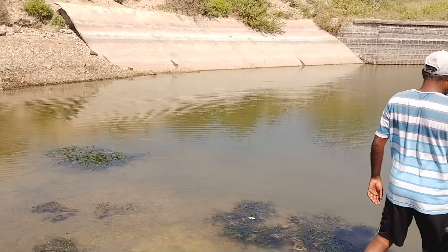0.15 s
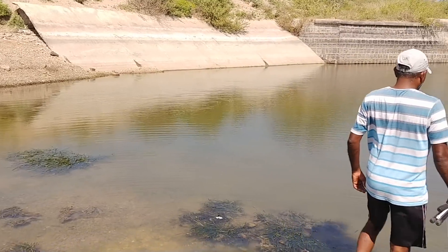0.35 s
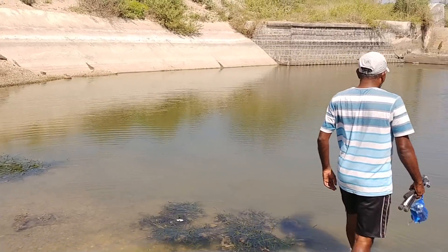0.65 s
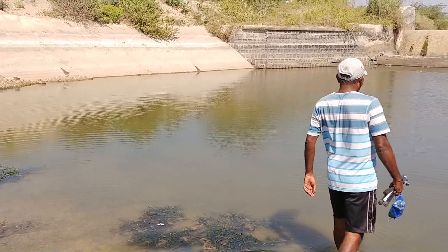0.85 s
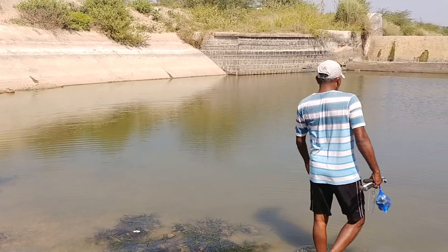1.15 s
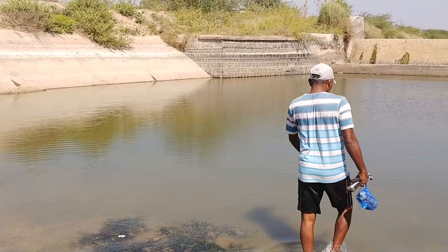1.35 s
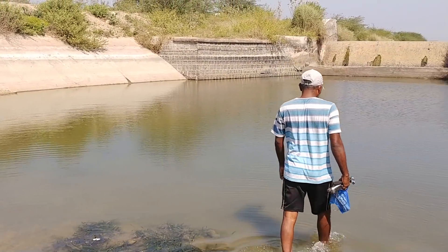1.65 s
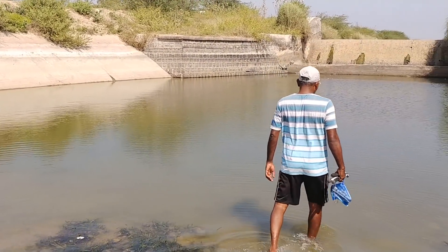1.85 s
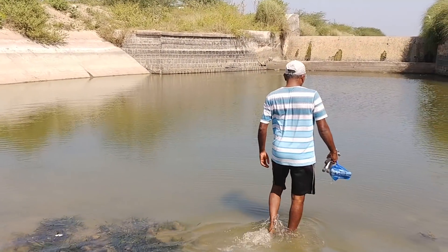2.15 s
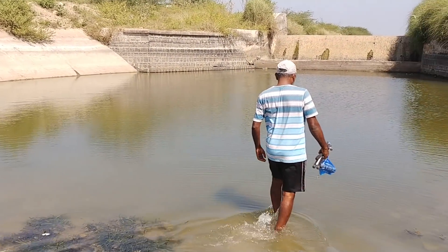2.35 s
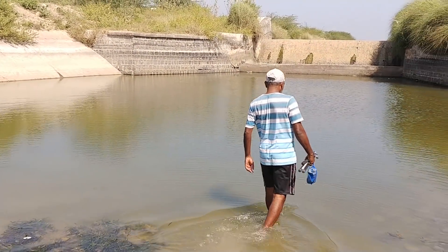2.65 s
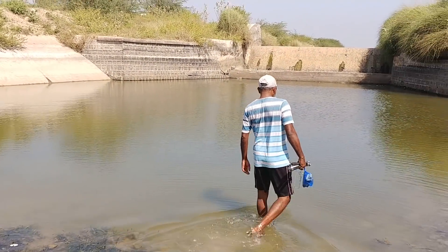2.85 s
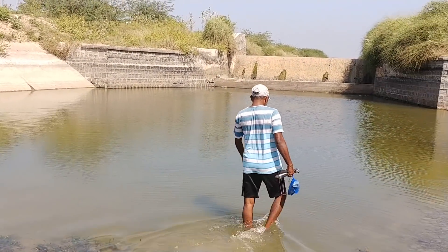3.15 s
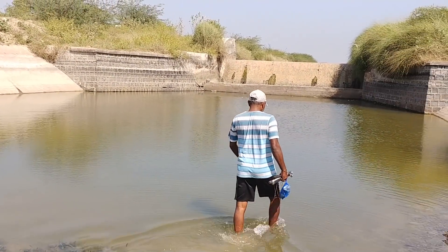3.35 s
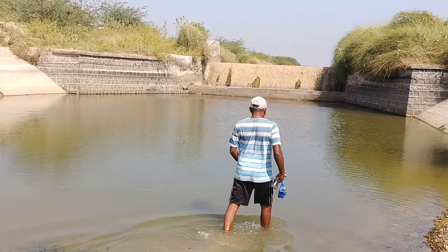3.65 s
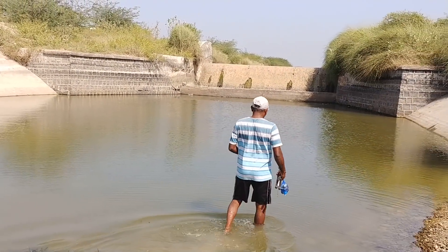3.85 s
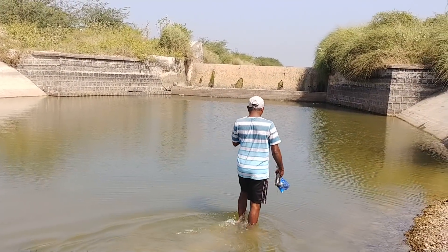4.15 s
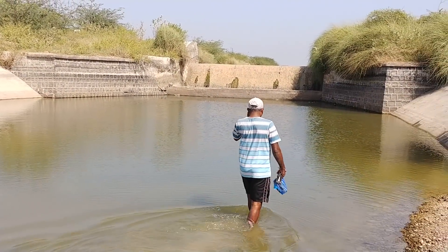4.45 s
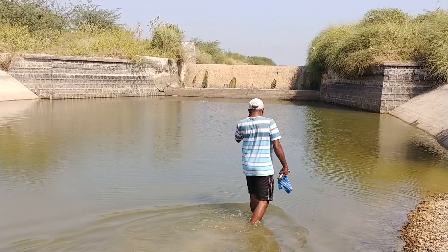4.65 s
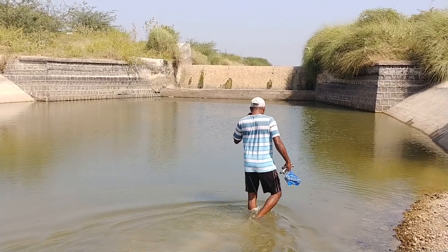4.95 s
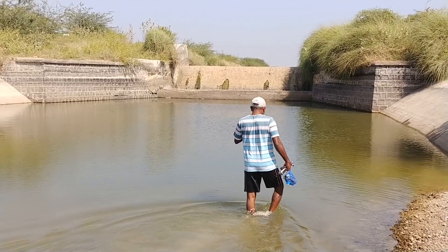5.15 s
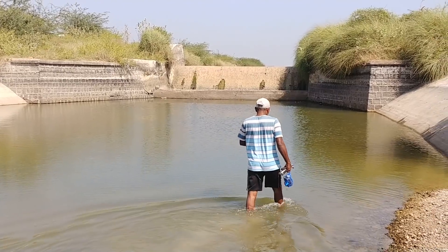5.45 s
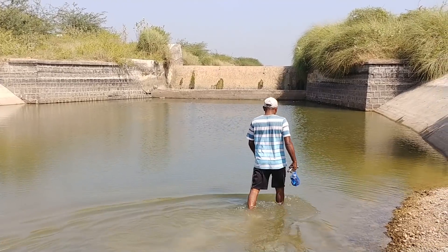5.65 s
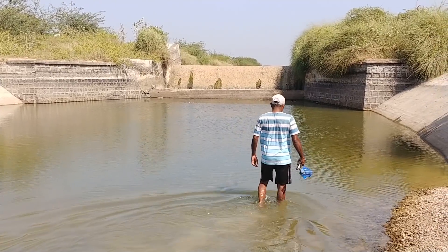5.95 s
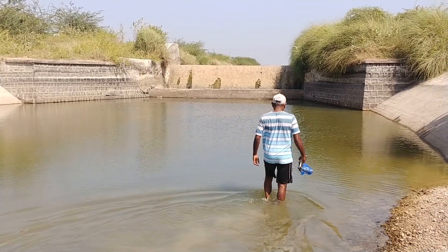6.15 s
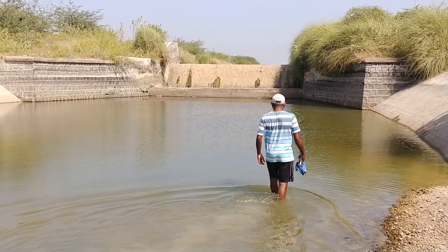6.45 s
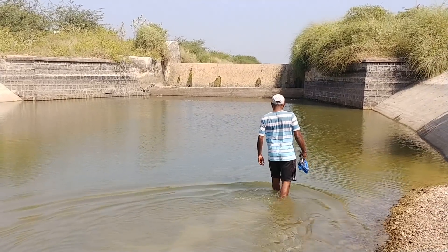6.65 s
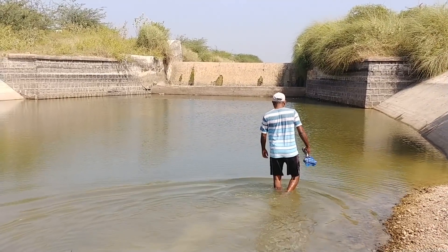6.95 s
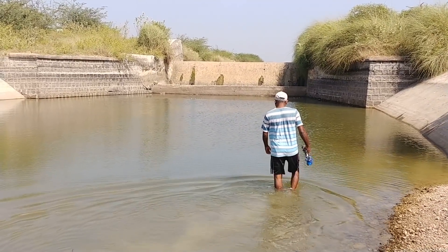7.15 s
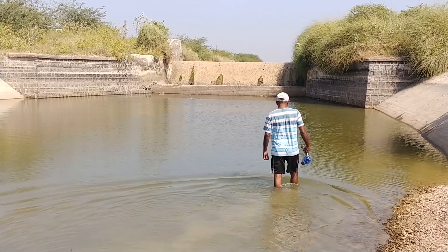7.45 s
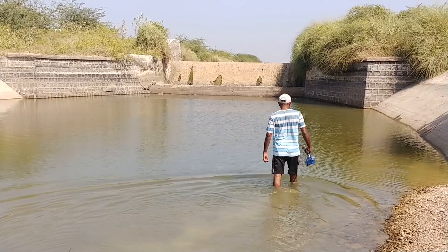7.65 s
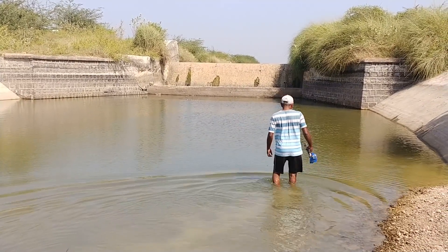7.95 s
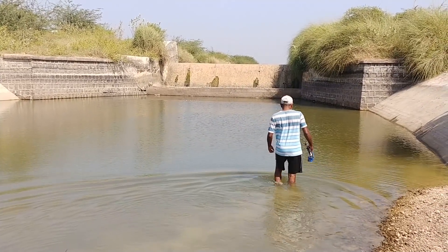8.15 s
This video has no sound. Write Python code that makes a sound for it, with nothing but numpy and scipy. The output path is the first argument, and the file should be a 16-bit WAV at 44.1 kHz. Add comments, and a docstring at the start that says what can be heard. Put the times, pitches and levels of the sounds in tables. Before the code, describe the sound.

Low wind buffeting fills the left channel in uneven gusts, with brief lulls, while the right stays clearer. Beneath it, legs push through shallow water: a crisp splash and cluster of plops first, then roughly one bubbling, spraying stride per second. Droplets smack and plink between. The steps recede and weaken, with only weak echoes from the banks around the open pond.

```python
"""A man wades away through a shallow pond, right of a hand-held camera with a left and a right microphone port.
At once wind rumbles and buffets on the left port; it barely reaches the sheltered right one.
The first stride brings a cluster of drops: each smacks the surface and rings as a trapped bubble.
About once a second a leg then pushes up a wave that breaks into bubbles and spray, with plinks of run-off.
Most later strides are fainter, trickling fades between them, and an even hiss thins out after four seconds."""
import sys
import numpy as np
from scipy import signal
from scipy.fft import rfft, irfft, next_fast_len
from scipy.io import wavfile
from scipy.ndimage import uniform_filter1d

SR = 44100
rng = np.random.default_rng(int(sys.argv[2]) if len(sys.argv) > 2 else 0)


def unload_audio(sound):
    """Save the sound as a 16-bit wav file, at the path given as the first command line argument."""
    columns = np.transpose(np.atleast_2d(sound))
    # keep every value between -1 and 1, then stretch to whole-number steps
    steps = np.round(np.clip(columns, -1, 1) * 32767)
    wavfile.write(sys.argv[1], SR, steps.astype(np.int16))


N = 366471
TIME = np.arange(N) / SR
LIFT_S = 0.025  # rise time of water set moving by a leg
SPATTER_FALL_S = 0.013  # decay time of landing water and of run-off
RECEDE_DB_PER_S = 2  # the trickling fades as he walks away


def gain_of(db):
    """Decibels to amplitude."""
    return 10 ** (np.asarray(db) / 20)


def evened(x):
    """Scales to rms 1."""
    return x / np.sqrt(np.mean(x ** 2) + 1e-20)


def read(points, hz):
    """Reads a spectrum on a log-frequency axis."""
    f, value = np.transpose(points)
    return np.interp(np.log(hz + 1), np.log(f + 1), value)


def curves(rows):
    """Each column of a timed table, at every sample."""
    s, *columns = np.transpose(rows)
    return [np.interp(TIME, s, c) for c in columns]


def add(mix, s, sound):
    """Mixes a sound in at a time in seconds."""
    part = mix[max(round(s * SR), 0):][:len(sound)]
    part += sound[:len(part)]


def shaped(x, gain):
    """Filters x by a gain that is a function of frequency."""
    size = next_fast_len(x.shape[-1], True)
    spectrum = rfft(x, size) * gain(np.fft.rfftfreq(size, 1 / SR))
    return irfft(spectrum, size)[..., :x.shape[-1]]


def coloured(x, spectrum):
    """Filters x by a spectrum in dB."""
    return shaped(x, lambda hz: gain_of(read(spectrum, hz)))


def band(x, low_hz, high_hz):
    """Keeps the band between two frequencies."""
    return signal.lfilter(*signal.butter(2, [low_hz, high_hz], "band", fs=SR), x)


def wander(rate):
    """Random drift of rms 1 with about this many turns a second."""
    steps = rng.standard_normal(4096)
    return evened(np.interp(TIME * rate, np.arange(len(steps)), steps))


def puff(length, rise_s, fall_s):
    """Envelope of a short burst: quick rise, hold, quick fall."""
    t = np.arange(SR) / SR
    return np.minimum(t / rise_s, 1) * np.exp(-np.maximum(t - rise_s / 2 - length, 0) / fall_s)


# even hiss of the open air, probably breeze in the grass on the banks: start_s [s], level_db [dB, uncoloured]
AIR_HISS = [(3.9, -40), (5.85, -47), (6.9, -47)]


def open_air():
    """Steady noise whose level follows the hiss table."""
    return gain_of(curves(AIR_HISS)[0]) * rng.standard_normal(N)


def banks(x, echo_db=-16, t60=0.16, delay=.025):
    """Weak scattered echoes off the stone banks."""
    t = np.arange(SR // 2) / SR
    taps = rng.standard_normal(len(t)) * (t >= delay) * np.exp(-np.log(1000) * t / t60)
    return gain_of(echo_db) * signal.oaconvolve(x, taps / np.linalg.norm(taps))[:N]


def wind(strength_db, spectrum, reference_db, brighten, lump_db, flutter_db, level_db):
    """Turbulence at a port: a faster flow sheds smaller eddies, so the upper bands swell and flutter most."""
    force_db = strength_db - reference_db + lump_db * wander(60)
    flow = coloured(rng.standard_normal(N), spectrum)
    # even out the noise: the gust alone sets the strength of the rumble
    power = uniform_filter1d(uniform_filter1d(flow ** 2, size=700), size=700)
    flow /= np.sqrt(power + 1e-12)
    fine = shaped(flow, lambda hz: 1 - 1 / (1 + (hz / 240) ** 4))
    fine_db = brighten * np.minimum(force_db, 5) + flutter_db * np.minimum(wander(80), 2)
    return gain_of(reference_db + force_db + level_db) * (flow + fine * (gain_of(fine_db) - 1))


# wind on the sheltered right port: start_s [s], level_db [dB, before trim]
SHELTERED_BREEZE = [(0.23, -21), (0.46, -35), (1.28, -32.5), (2.02, -42.5), (2.42, -35.5), (3.46, -49.5),
                    (3.82, -34), (4.91, -53), (5.08, -38), (5.42, -45), (5.59, -27), (5.72, -47),
                    (6.09, -34.5), (8.31, -48.5)]
# spectrum of that wind: pitch_hz [Hz], level_db [relative dB per Hz]
SHELTERED_RUMBLE = [(15, 0), (40, 11), (65, 19.5), (110, 2), (200, -10), (400, -26.5), (1500, -82.5)]


def sheltered_wind():
    """Low turbulence on the right port, whose upper bands grow little with the wind."""
    return wind(curves(SHELTERED_BREEZE)[0], SHELTERED_RUMBLE, reference_db=-27,
                brighten=0.17, lump_db=5.0, flutter_db=4, level_db=-2.0)


# breeze on the exposed left port: start_s [s], level_db [dB, before trim]
EXPOSED_BREEZE = [(-0.0, -23), (0.85, -20.5), (0.97, -26), (1.58, -19), (2.01, -29), (2.15, -20),
                  (2.68, -27), (3.3, -25), (3.6, -24.5), (3.78, -32), (4.19, -25), (5.2, -25), (5.32, -30),
                  (6.3, -23), (7.26, -23.5), (7.7, -23), (8.31, -31.5)]
# gusts on that port: start_s [s], length_s [s], level_db [dB, before trim]
EXPOSED_GUSTS = [(0.096, 0.39, -13.5), (0.49, 0.19, -15), (1.288, 0.018, -7), (1.345, 0.4, -17),
                 (1.733, 0.086, -14.5), (2.247, 0.0058, -6), (2.562, 0.09, -20), (2.819, 0.069, -11),
                 (2.938, 0.01, -3), (3.378, 0.09, -19), (3.732, 0.024, -15), (3.934, 0.0082, -11),
                 (4.299, 0.036, -17), (4.372, 0.046, -13), (4.547, 0.048, -15.5), (4.978, 0.096, -18),
                 (5.161, 0.1, -16), (5.456, 0.051, -13.5), (5.54, 0.053, -14.5), (5.762, 0.022, -12.5),
                 (5.875, 0.12, -19.5), (6.088, 0.044, -9.5), (6.212, 0.095, -16), (6.464, 0.15, -12),
                 (6.705, 0.0073, -4.5), (6.883, 0.053, -12), (7.02, 0.02, -10), (7.11, 0.039, -17),
                 (7.361, 0.013, -15), (7.46, 0.16, -15), (7.714, 0.033, -10), (8.162, 0.18, -19)]
# the breeze drops out: start_s [s], length_s [s], change_db [dB]
BREEZE_LULLS = [(3.099, 0.17, -19), (4.039, 0.05, -10), (4.594, 0.036, -18), (4.775, 0.099, -16.5),
                (6.745, 0.054, -11), (7.057, 0.046, -8), (7.416, 0.03, -11), (7.751, 0.1, -3.5),
                (8.06, 0.067, -13)]


def gusting(gust_db=-2.0, rise_s=0.009, fall_s=0.0091):
    """Force of the wind on the exposed port in dB: a breeze that drops out in lulls, with gusts on top."""
    lull_db, power = np.zeros(N), np.zeros(N)
    for s, length, db in BREEZE_LULLS:
        add(lull_db, s - rise_s / 2, db * puff(length, rise_s, fall_s))
    for s, length, db in EXPOSED_GUSTS:
        gust = gain_of(db + gust_db) * puff(length, rise_s, fall_s)
        add(power, s - rise_s / 2, gust ** 2)
    breeze = gain_of(curves(EXPOSED_BREEZE)[0] + lull_db)
    return 10 * np.log10(power + breeze ** 2)


# spectrum of the exposed wind: pitch_hz [Hz], level_db [relative dB per Hz]
EXPOSED_RUMBLE = [(15, -66), (30, -18), (50, 0), (100, 3), (180, -5), (380, -18.5), (600, -31),
                  (1000, -47.5), (2000, -86)]


def exposed_wind():
    """Strong turbulence on the left port, which brightens in the gusts."""
    return wind(gusting(), EXPOSED_RUMBLE, reference_db=-22.5,
                brighten=0.72, lump_db=3.6, flutter_db=5, level_db=0.4)


def jolt(length, colour):
    """A brief burst of pressure with a peak of 1, centred in a tenth of a second."""
    t = np.arange(-SR // 20, SR // 20) / SR
    pressure = coloured(rng.standard_normal(len(t)) * np.exp(-(t / length) ** 2), colour)
    return pressure / abs(signal.hilbert(pressure)).max()


# eddies that strike the left port: peak_s [s], snap_db, thud_db [peak dB, before trim]
EDDY_HITS = [(0.1874, -9, -15), (0.25, -18, -6), (0.273, -20, -10.5), (0.3292, -30, -8),
             (0.4933, -17, -8.5), (0.5047, -22, -9), (0.5893, -24, -8.5), (0.75, -34, -11),
             (1.3004, -17, -13), (1.4833, -32, -8.5), (1.5032, -32, -6), (1.5688, -22, -9),
             (1.592, -31, -7.5), (1.632, -23, -22), (1.7556, -21, -11.5), (2.8623, -29, -13),
             (2.8722, -16.5, -6.5), (2.941, -12.5, -8), (4.182, -36, -24), (5.17, -23.5, -15),
             (5.4951, -26, -3.5), (6.1114, -28, -13.5), (6.136, -17, -9.5), (6.2825, -20.5, -5),
             (6.4632, -30.5, -5.5), (6.8997, -30, -12), (6.9118, -19, -21), (7.0207, -25, -16.5),
             (7.0346, -23, -11.5), (7.475, -25.5, -12), (7.503, -40, -10.5), (7.5258, -22.5, -7.5),
             (7.5654, -13, -12.5), (7.7192, -15.5, -3), (7.729, -28, -11.5)]
# spectra of the two parts of a hit: pitch_hz [Hz], level_db [relative dB]
THUD_SPECTRUM = [(50, -9), (170, 0), (420, -1), (900, -30), (2500, -90)]
SNAP_SPECTRUM = [(250, -10), (600, -1), (1150, -2), (1700, -22), (4000, -75)]


def buffets(snap_s=0.0007, thud_s=0.004, snap_gain_db=4.5, thud_gain_db=3.5):
    """A strong eddy hits the port: a round thud with a sharp, hollow snap at its peak."""
    out = np.zeros(N)
    for s, snap_db, thud_db in EDDY_HITS:
        snap = gain_of(snap_db + snap_gain_db) * jolt(snap_s, SNAP_SPECTRUM)
        thud = gain_of(thud_db + thud_gain_db) * jolt(thud_s, THUD_SPECTRUM)
        add(out, s - len(snap) / 2 / SR, snap + thud)
    return out


# flung drops that smack the surface and trap no air: start_s [s], level_db [peak dB at the source]
DROP_SMACKS = [(0.336, -7), (0.558, -10), (2.157, -11), (2.726, -22), (2.984, -16), (3.332, -11),
               (3.444, -16), (3.57, -11.5), (5.462, -17), (7.327, -17)]


def smacks(die_s=0.0031, low_hz=3500, high_hz=9000):
    """Each flung drop lands with a short bright crack of band-limited noise."""
    out, t = np.zeros(N), np.arange(SR // 20) / SR
    for s, db in DROP_SMACKS:
        crack = band(rng.standard_normal(len(t)) * np.exp(-t / die_s), low_hz, high_hz)
        add(out, s, gain_of(db) * crack / abs(crack).max())
    return out


# larger bubbles that chirp upwards as they surface:
# start_s [s], pitch_hz [Hz at the start], level_db [peak dB at the source]
SURFACING_BUBBLES = [(3.005, 1546, -26), (4.159, 1680, -25.5), (5.064, 1690, -26), (7.349, 1380, -28),
                     (7.769, 870, -40)]


def chirps(cycles=30, climb=0.45):
    """A surfacing bubble swells and fades; its pitch climbs ever faster, by this share in all."""
    out = np.zeros(N)
    for s, hz, db in SURFACING_BUBBLES:
        age = np.linspace(0, 1, int(cycles / hz * SR))
        turns = np.cumsum(hz * (1 + climb * age ** 2)) / SR
        swell = np.sin(np.pi * np.sqrt(age)) ** 2
        add(out, s, gain_of(db) * swell * np.sin(2 * np.pi * turns))
    return out


def bubble(hz, t60, rise):
    """A bubble rings and dies; its pitch climbs by rise Hz a second as it nears the surface."""
    t = np.arange(int(t60 * SR) + 8) / SR
    ring = np.exp(-np.log(1000) * t / t60) * (1 - np.exp(-hz * t))
    return ring * np.sin(2 * np.pi * (hz * t + rise * t ** 2 / 2))


# single drops and air pockets: start_s [s], pitch_hz [Hz at the start], level_db [nominal peak dB at the source]
SINGLE_DROPS = [(0.119, 3790, -25), (0.213, 1430, -15.5), (0.226, 930, -11), (0.244, 627, -15.5),
                (0.262, 1120, -18.5), (0.284, 1285, -16.5), (0.285, 4550, -12.5), (0.336, 2150, -12),
                (0.452, 3720, -17.5), (0.787, 3600, -18.5), (0.846, 3020, -24), (0.866, 1960, -21),
                (1.055, 3080, -11.5), (1.128, 855, -20.5), (1.585, 4700, -12), (1.689, 3900, -13.5),
                (2.039, 2080, -20.5), (2.111, 2750, -15.5), (2.124, 2030, -17.5), (2.191, 3360, -11),
                (2.301, 3560, -14.5), (2.773, 2040, -22.5), (3.163, 2200, -25), (3.321, 2740, -15),
                (3.662, 1353, -23.5), (4.034, 3580, -16), (4.315, 1034, -23.5), (5.09, 2740, -20),
                (5.117, 3160, -18), (6.351, 3010, -15.5), (6.433, 3590, -11.5), (7.082, 2870, -21.5),
                (7.105, 1630, -23), (7.304, 955, -22), (8.239, 1670, -24)]


def plops(rise=3500, cycles=65, smack_db=-9, smack_s=0.0067, satellite_db=-9, count=4):
    """A drop smacks the surface and traps one bubble, then a few weaker ones of other sizes."""
    out = np.zeros(N)
    for s, hz, db in SINGLE_DROPS:
        t60 = cycles / hz
        ring = bubble(hz, t60, rise)
        smack = rng.standard_normal(len(ring)) * np.exp(-np.arange(len(ring)) / (smack_s * SR))
        smack = band(smack, hz / 2, min(2 * hz, SR / 3))
        add(out, s, gain_of(db) * (ring + 2 * gain_of(smack_db) * smack))
        for late, size in rng.random((count, 2)):
            satellite = bubble(hz * 2 ** (size - .5), t60, rise)
            add(out, s + 0.026 * late, gain_of(db + satellite_db) * satellite)
    return out


def spills(per_s=70, die_s=0.008, depth=0.45):
    """The wave breaks in little spills: each starts at once and dies away, over a steady wash."""
    kicks = (rng.random(N) < per_s / SR) * np.minimum(rng.exponential(1, N), 3)
    return evened(1 + depth * signal.lfilter([1], [1, -np.exp(-1 / (die_s * SR))], kicks))


def spray(splash_db, spill, per_s=3000, spread_db=-0.5, follow=1.0, recede_db=0.17, level_db=-37.5):
    """Fine droplets tick on the surface; they fade by recede_db a second as the water gets deeper."""
    ticks = rng.standard_normal(N) * gain_of(spread_db * np.minimum(rng.exponential(1, N), 4))
    ticks *= rng.random(N) < per_s / SR
    ticks = evened(coloured(ticks, [(150, -30), (500, 5.0), (8000, 6.5), (12000, -4)]))
    return ticks * spill * gain_of(level_db + follow * (splash_db + 41.0) - recede_db * TIME)


def churn(splash_db, slosh_db, spill, per_s=2900, cycles=36, rise=8000, spread_db=5.0,
          level_db=-8.4, large_db=5.3, finest_hz=7000, count=56):
    """Clouds of bubbles of all sizes, shed as the wave breaks; those above finest_hz ring weakly."""
    out = np.zeros(N)
    pitches = np.geomspace(420, 10500, count)
    for hz, share in zip(pitches, pitches ** .5 / np.sum(pitches ** .5)):
        at = rng.integers(0, N, 4096)[:max(int(per_s * share * N / SR), 1)]
        size = gain_of(spread_db * np.minimum(rng.exponential(1, 4096), 3.2))[:len(at)]
        ring = bubble(hz, cycles * (.5 + rng.random()) / hz, rise * rng.uniform(0, 1.72))
        # small bubbles follow the splash, large ones the slosh
        large = np.clip(np.log2(1700 / hz), 0, 1)
        db = (1 - large) * splash_db[at] + large * (slosh_db[at] + large_db)
        db -= 10 * np.log10(1 + (hz / finest_hz) ** 4)
        # large bubbles are fewer; each pitch's power grows with its frequency, so the cloud's spectrum is level
        balance = np.sqrt(hz / pitches.mean() * N / len(at) / np.sum(ring ** 2))
        size = evened(size) * spill[at] * gain_of(db) * balance
        places = at[:, None] + np.arange(len(ring))
        out += np.bincount(places.ravel(), np.outer(size, ring).ravel(), N)[:N]
    return gain_of(level_db) * out


def swing(s, length, arch_db, fade):
    """Envelope of water stirred by a leg: it starts at once, arches with the leg's speed, then settles."""
    lifted = np.clip((TIME - s) / LIFT_S + .5, 0, 1)
    slowness = 1 - np.sin(np.pi * np.clip((TIME - s) / length, 0, 1))
    return lifted * gain_of(-arch_db * slowness - fade * np.maximum(TIME - s - length, 0))


# thrown water lands back on the pond: start_s [s], length_s [s], splash_db [dB, before trim]
LANDING_WATER = [(0.0, 0.023, -37), (0.72, 0.11, -41), (1.364, 0.058, -47), (1.646, 0.035, -38.5),
                 (2.376, 0.12, -40), (3.54, 0.009, -31), (4.112, 0.0073, -35), (5.437, 0.034, -33),
                 (5.64, 0.02, -43), (6.385, 0.025, -39), (7.361, 0.054, -39), (7.538, 0.034, -45)]
# a leg swings through the water: start_s [s], swing_s [s], splash_db [small bubbles, mid-swing dB before trim],
# slosh_db [large bubbles, likewise], settle_db_per_s [dB per s, small bubbles]
LEG_STRIDES = [(0.105, 0.66, -32, -36.5, 61), (1.031, 0.67, -33.5, -37, 30),
               (2.002, 0.72, -36.5, -38.5, 41), (2.963, 0.68, -36.5, -41.5, 114),
               (4.02, 0.57, -39, -43.5, 18), (5.014, 0.59, -38.5, -40.5, 24),
               (6.026, 0.6, -41, -45.5, 38.5), (7.085, 0.3, -42.5, -45, 21.5),
               (8.148, 0.97, -39, -37.5, 35)]
SPLASH_ARCH_DB, SLOSH_ARCH_DB = 7, 9  # louder at mid-swing than at the ends of the swing
SLOSH_FADE = 7  # large bubbles die out this many times faster than small ones
SLOSH_LAG_S = 0.015  # large bubbles follow the first spray, once the leg pushes a wave
CALM_SPLASH_DB, CALM_SLOSH_DB = -50.5, -62.5  # trickling between strides, at the start, before trim
SPATTER_SLOSH_DB = -8  # a spatter's large bubbles against its small ones, before trim


def wading(spatter_rise_s=0.0033):
    """Levels of splash and slosh in dB: they follow each swinging leg and jump when thrown water lands."""
    spatter = np.zeros(N)
    for s, length, db in LANDING_WATER:
        add(spatter, s, (gain_of(db) * puff(length, spatter_rise_s, SPATTER_FALL_S)) ** 2)
    splash = gain_of(CALM_SPLASH_DB - RECEDE_DB_PER_S * TIME) ** 2 + spatter
    slosh = gain_of(CALM_SLOSH_DB - RECEDE_DB_PER_S * TIME) ** 2
    slosh += gain_of(SPATTER_SLOSH_DB) ** 2 * spatter
    for s, length, splash_db, slosh_db, fade in LEG_STRIDES:
        small = swing(s, length, SPLASH_ARCH_DB, fade)
        large = swing(s + SLOSH_LAG_S, length - SLOSH_LAG_S, SLOSH_ARCH_DB, SLOSH_FADE * fade)
        splash += (gain_of(splash_db) * small) ** 2
        slosh += (gain_of(slosh_db) * large) ** 2
    return 10 * np.log10(splash), 10 * np.log10(slosh)


def trickle(run_off_s=0.22, run_off_db=-5, calm_db=-55):
    """Run-off of each stride in separate ringing plinks, with faint dripping between strides."""
    power = gain_of(calm_db - RECEDE_DB_PER_S * TIME) ** 2
    for s, _, splash_db, _, _ in LEG_STRIDES:
        run_off = gain_of(splash_db + run_off_db) * puff(run_off_s, LIFT_S, SPATTER_FALL_S)
        add(power, s, run_off ** 2)
    db = 10 * np.log10(power)
    return churn(db, db - 17, np.ones(N), per_s=100, cycles=75, spread_db=5, level_db=-19)


# how each port colours water and air: pitch_hz [Hz], level_db [dB]
LEFT_COLOUR = [(250, -4.5), (600, -9), (1120, -7.5), (1370, -15.5), (1620, -2), (2000, -19.5), (2330, -10),
               (2950, -24), (3900, -17.5), (5500, -25), (6500, -28), (11200, -24.5)]
RIGHT_COLOUR = [(250, 2.5), (600, -6), (1500, -5.5), (1900, -10.5), (2230, -5.5), (2520, -9.5), (2900, -5),
                (3400, -7), (4200, -13), (4700, -8), (5500, -12), (6300, -23), (8300, -11), (11300, -22.5)]
# water sound that arrives alike at both ports: pitch_hz [Hz], share [0 to 1]
SHARED_WATER = [(1700, 0.95), (2850, 0.45), (3500, 0.78), (4800, 0.74), (6800, 0.3), (8800, 0.45)]
# lead of the left port: pitch_hz [Hz], phase_rad [radians]
LEFT_LEAD = [(600, -0.2), (2250, -0.9), (2750, -2.8), (3000, 1.2), (4000, 0)]


def ports(wash, other_wash, drops):
    """The two ports hear partly different bubbles and colour the water, its echo and the open air differently."""
    alike = lambda hz: np.clip(read(SHARED_WATER, hz), 0, 1)
    unlike = lambda hz: np.sqrt(1 - alike(hz) ** 2)
    left = drops + shaped(wash, alike) + shaped(other_wash, unlike)
    left = shaped(left, lambda hz: np.exp(1j * read(LEFT_LEAD, hz)))
    right = wash + drops
    return np.array([coloured(water + banks(water) + open_air(), colour)
                     for water, colour in ((left, LEFT_COLOUR), (right, RIGHT_COLOUR))])


def scene():
    """Wading heard through the wind, on a left and a right port."""
    splash_db, slosh_db = wading()
    breaking, flung = spills(), spills(per_s=25, depth=1.2)
    washes = [churn(splash_db, slosh_db, breaking) + spray(splash_db, flung) for _ in range(2)]
    drops = plops() + chirps() + smacks() + trickle()
    blowing = np.array([exposed_wind() + buffets(), sheltered_wind()])
    return ports(*washes, drops) + blowing


def record(dry, ceiling=1.0, edge_hz=11900):
    """The microphone's loudest peaks are rounded off; then the band limit."""
    rounded = dry / (1 + (dry / ceiling) ** 4) ** (1 / 4)
    low_pass = signal.firwin(255, edge_hz, window=("kaiser", 8), fs=SR)
    return signal.oaconvolve(rounded, low_pass[None], "same")


dry = scene()
out = record(dry)
unload_audio(out)
```